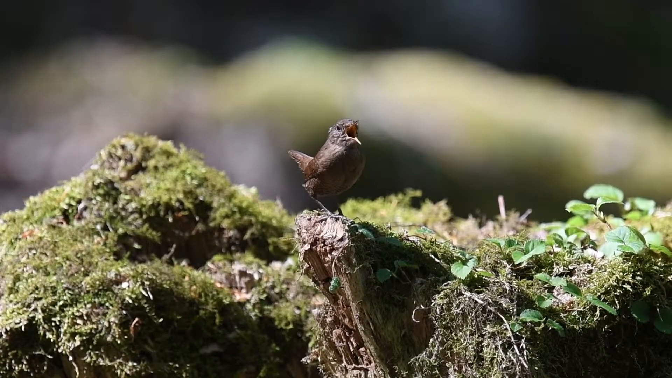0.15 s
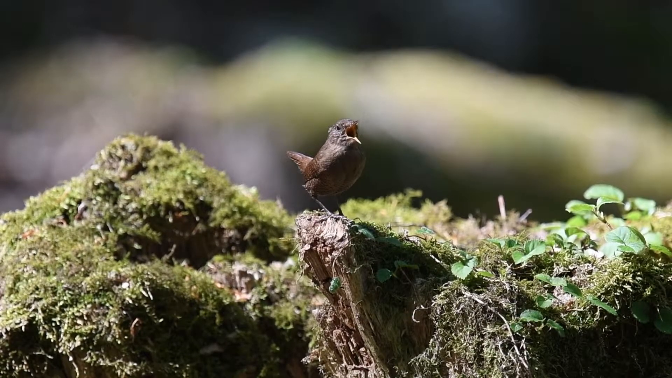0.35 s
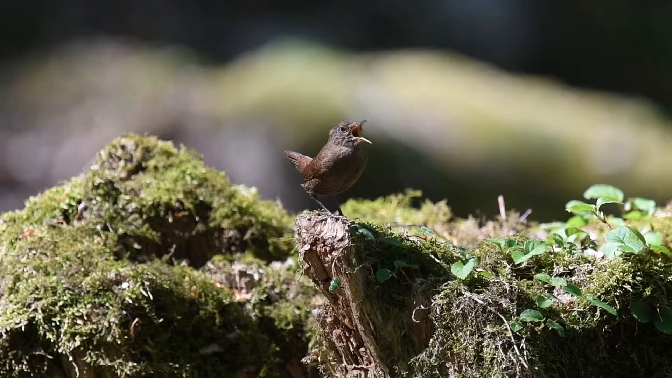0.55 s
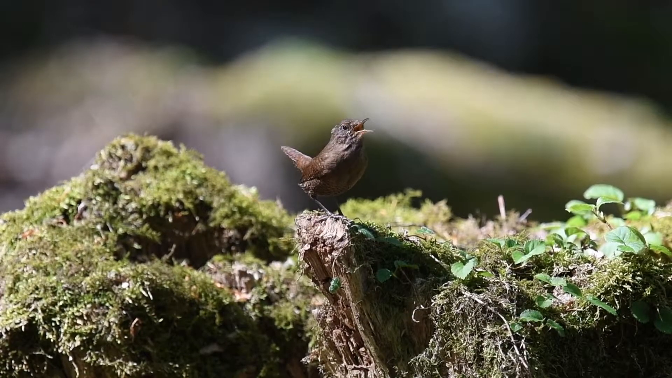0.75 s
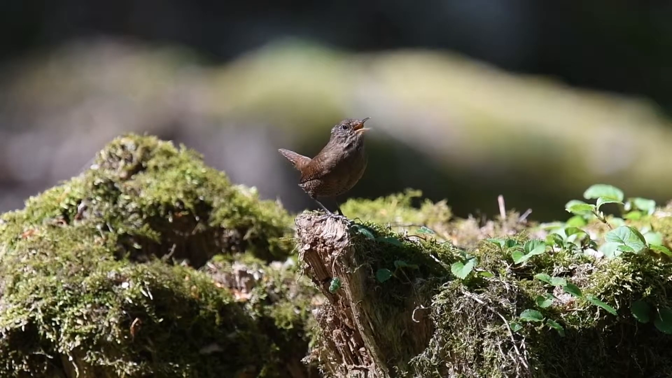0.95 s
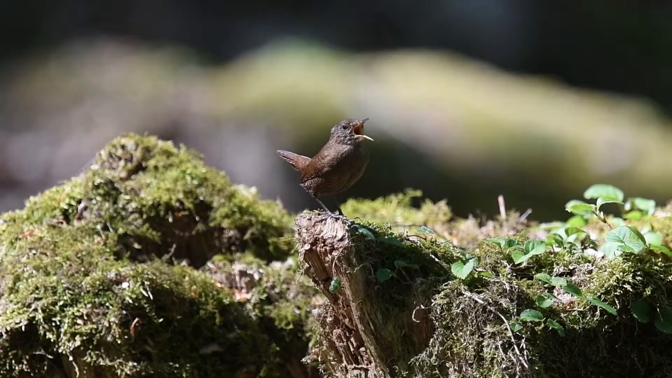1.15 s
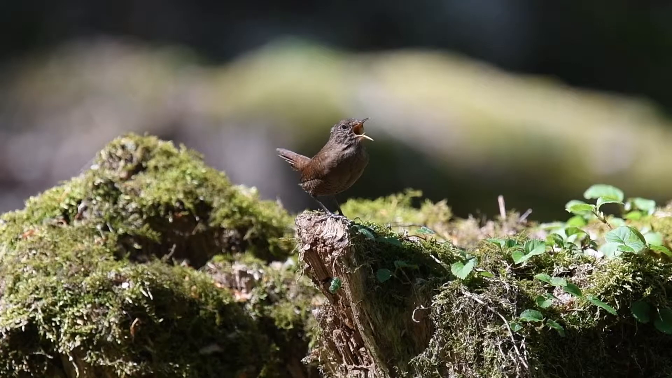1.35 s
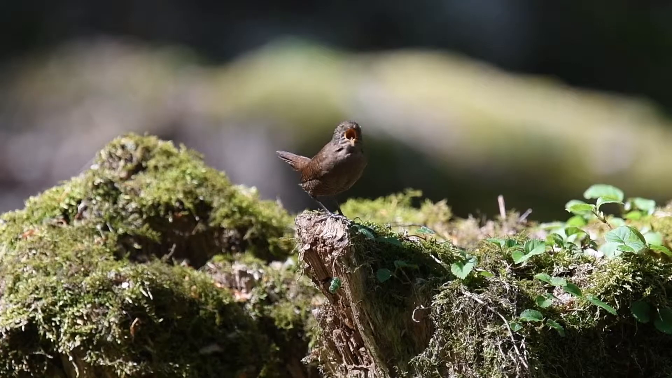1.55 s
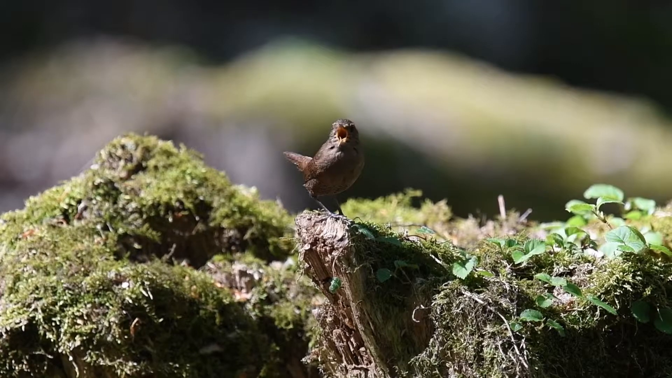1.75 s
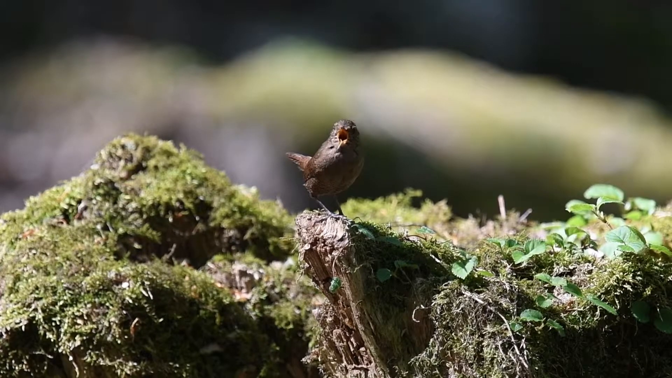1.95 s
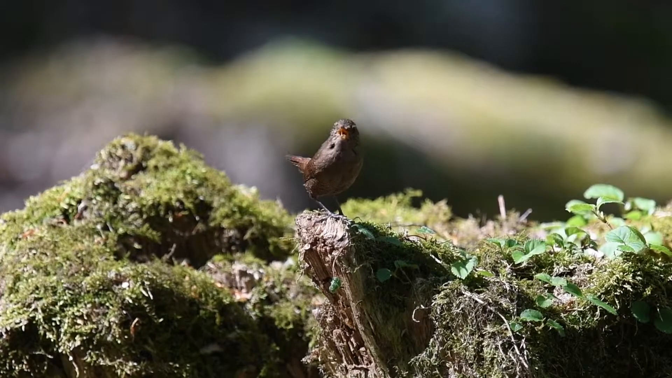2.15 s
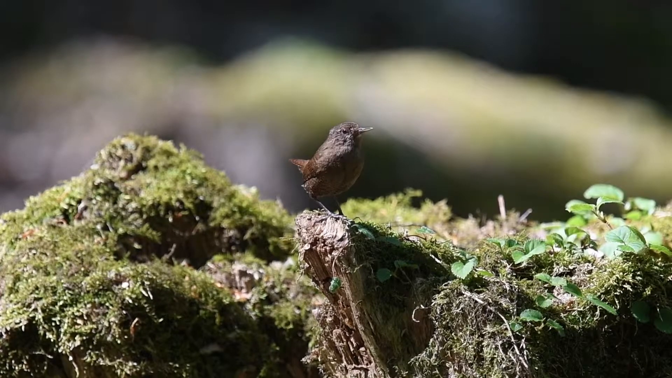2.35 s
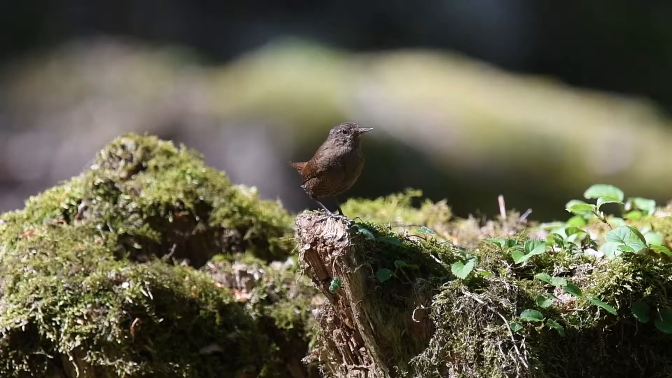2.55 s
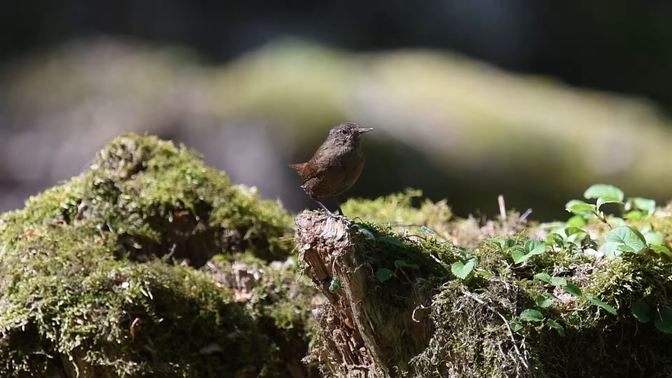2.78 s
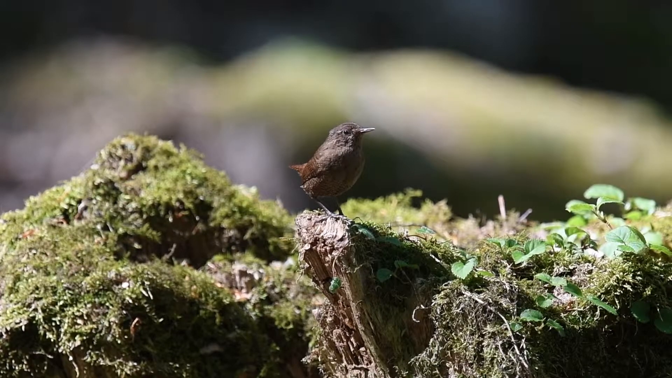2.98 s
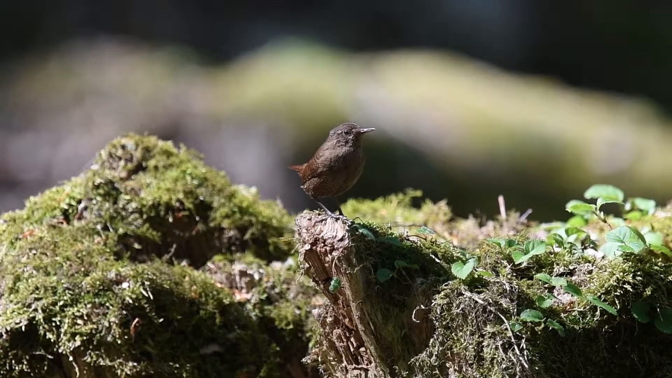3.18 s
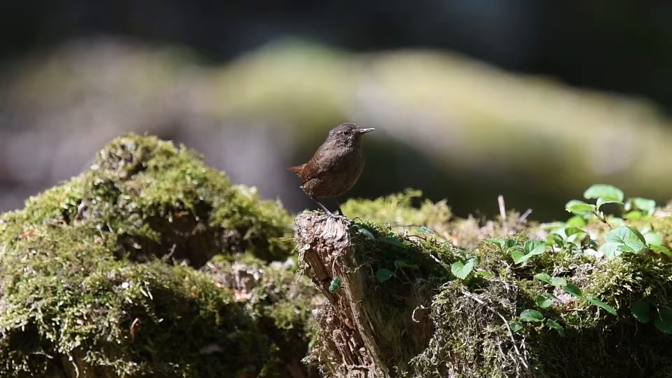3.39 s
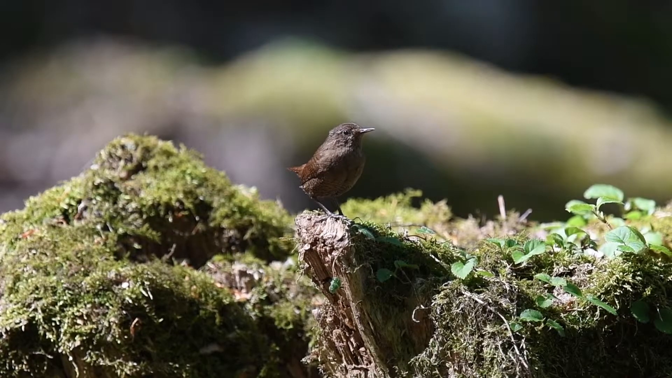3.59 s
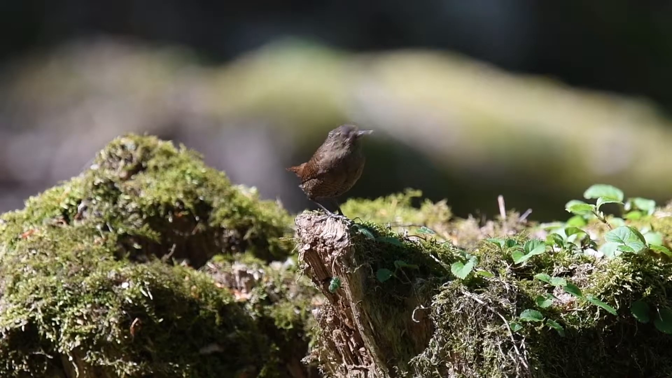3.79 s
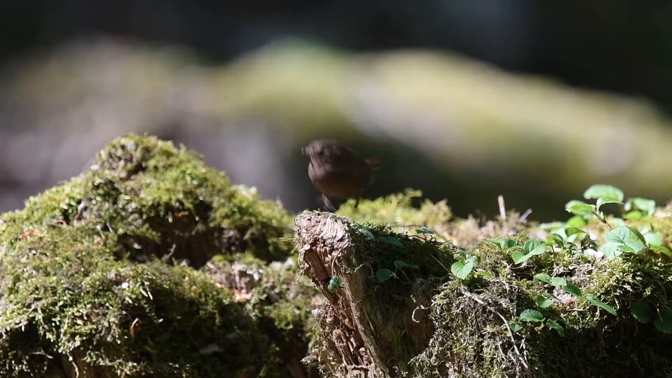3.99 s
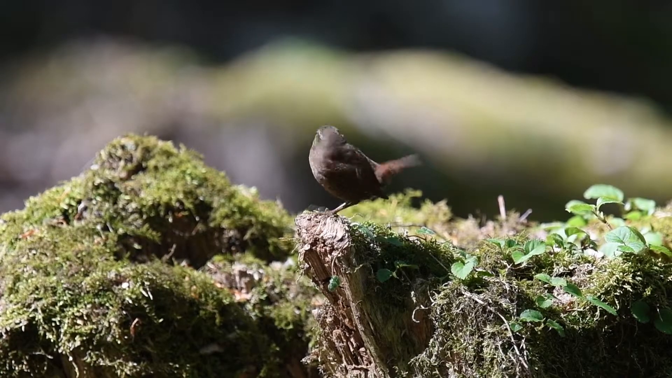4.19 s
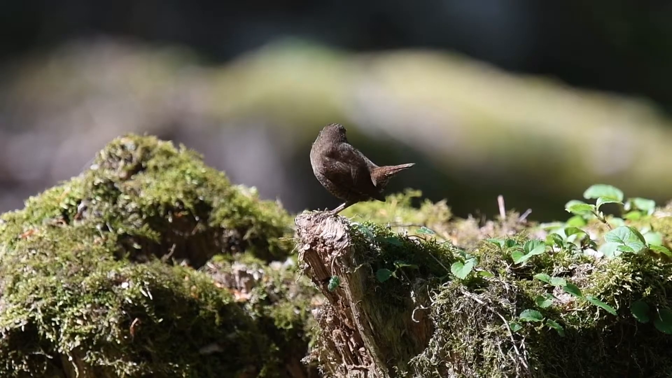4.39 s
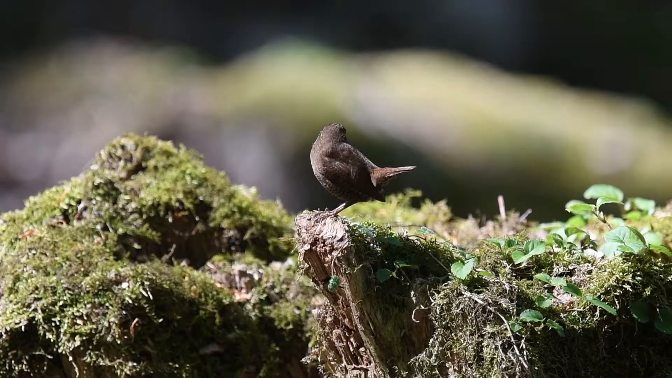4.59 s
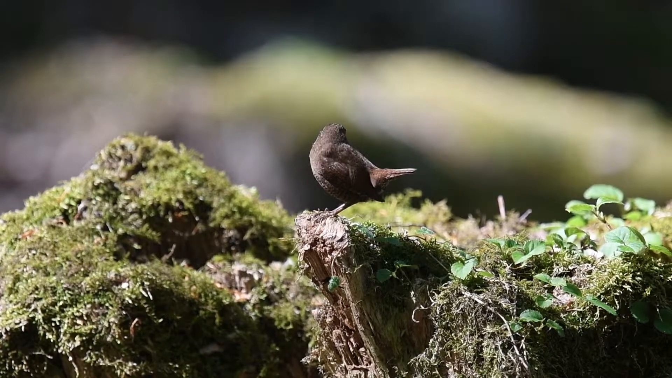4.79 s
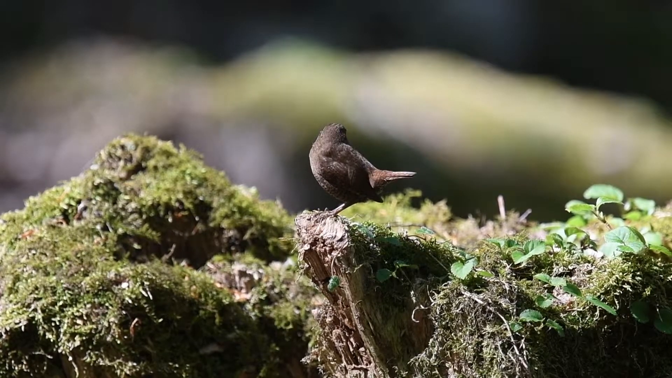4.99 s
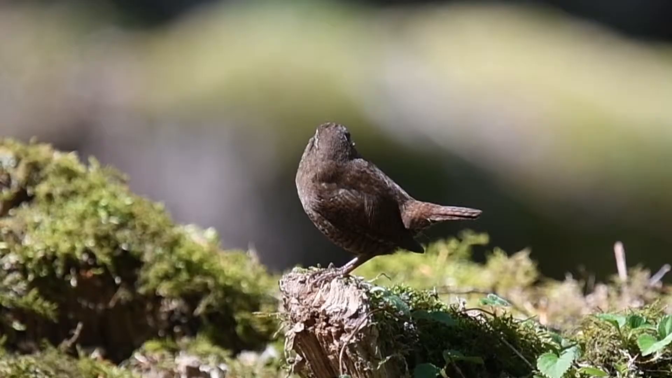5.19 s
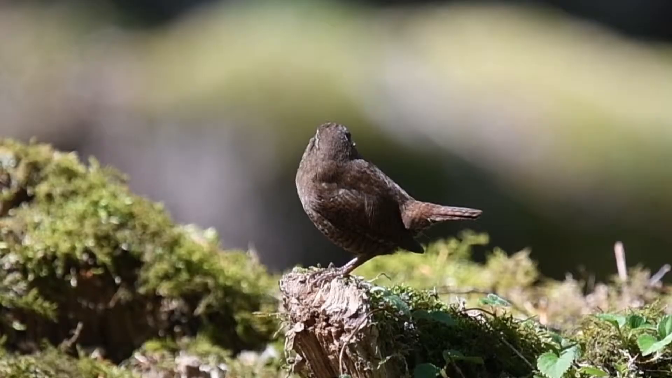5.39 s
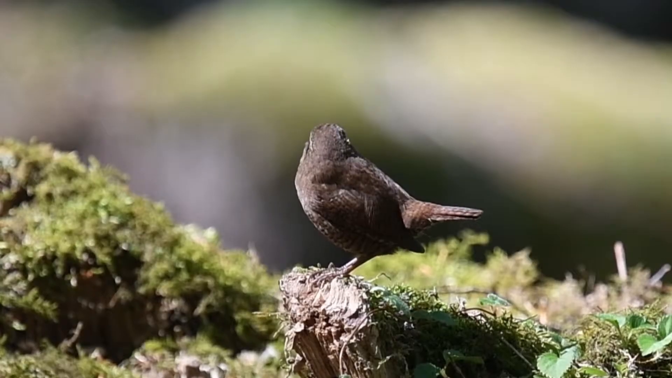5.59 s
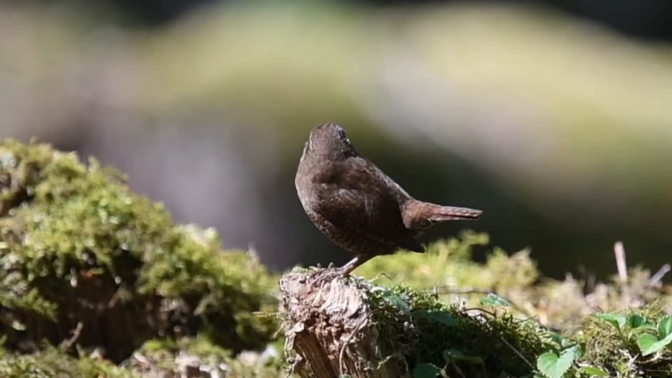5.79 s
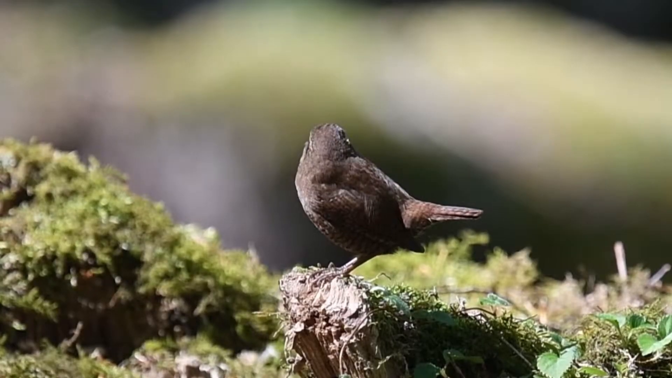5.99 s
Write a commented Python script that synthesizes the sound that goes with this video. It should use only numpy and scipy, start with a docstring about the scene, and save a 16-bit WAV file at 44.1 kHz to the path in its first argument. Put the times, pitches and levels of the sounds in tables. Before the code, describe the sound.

A mountain stream rushes smoothly and evenly for about six seconds, soft and wide, leaning a little right, without distinct splashes. At 0 s the echo of a wren's previous note fades, and the nearby bird continues with bright, almost pure whistles, each about a tenth of a second: a short flick, high arches, a falling note, then two upward sweeps near 0.85 and 1.0 s. From 1.4 to 2.1 s it quickens into a tight trill of repeated three-note groups, then ends with a lower note and a tiny blip by 2.3 s. Close reflections and a short woodland ring surround it. Two faint distant calls lie beneath at 0.4 and 0.75 s. From 2.3 to 4.2 s, far birds answer with quick sliding whistles and tiny chips, mostly slightly right. Sparser faint tones follow, then soft pips around 5.2 s and fluttering rising whistles at 5.5 and 5.8 s, blurred by echo.

```python
"""A mountain stream runs throughout: shaped noise in a smooth, even rush a little to the right.
It opens on the echo of a wren's note; close by on a mossy stump, the wren ends its song by 2.3 s.
Its notes are gliding near-pure sines with faint overtones, near echoes and a ring between the trees.
Two faint calls of farther birds sound under the song; from its last note to the end many more answer,
as fluttering whistles in a wash of scattered sound."""
import sys
import numpy as np
from scipy import signal
from scipy.fft import rfft, irfft, next_fast_len
from scipy.io import wavfile

SR = 44100
rng = np.random.default_rng(int(sys.argv[2]) if len(sys.argv) > 2 else 0)


def to_wav(sig):
    """Store sig (one row per channel, or 1-D mono) as 16-bit WAV at the path in sys.argv[1].

    Samples outside -1..1 are clipped; the rate is SR.
    """
    pcm = np.clip(np.atleast_2d(sig), -1, 1) * 32767
    pcm = np.round(pcm).astype(np.int16)
    wavfile.write(sys.argv[1], SR, pcm.T)  # frames by channels


N = 266364
LEAD = SR // 4  # samples of run-up, so that a note before the start can leave its echo
CUTOFF_HZ = 15750
EDGE_S = 0.0016  # fade at both ends of every whistle

# Colour of the stream. Each row: frequency in Hz, relative level in dB per Hz.
STREAM_SPECTRUM = [(25, -33.5), (50, -22.5), (90, -7.5), (150, -6.5), (250, -8), (450, -5), (900, -5),
                   (1600, -3), (3000, -8), (5500, -13), (7500, -17.5), (9500, -24), (12000, -36.5),
                   (15700, -29.5)]
STREAM_DB = -38.5  # RMS over both channels
# Lean of the stream to one side. Each row: frequency in Hz, left minus right in dB.
STREAM_BALANCE = [(330, 0), (450, -.6), (740, -2), (1300, -3.6), (2200, -3.4), (3300, -2.5), (6000, -1.6),
                  (15000, -.5)]
# Width of the stream. Each row: frequency in Hz, share that only the left hears in dB,
# lag of the left in the shared part in radians.
STREAM_WIDTH = [(60, -37, 0), (200, -38, 0), (300, -24, 0), (450, -11, .1), (800, -4, .4),
                (1200, -1.1, 1.2), (1600, -.8, 2.1), (2300, -.8, 3.0), (3500, -.3, 3.6), (6800, -.1, 5.9)]

# Ring of the wood. Each row: frequency in Hz, time to die by 60 dB in seconds (for the wren).
WOOD_DECAY = [(3000, 0.73), (6000, 0.56), (9000, 0.39)]
WOOD_ONSET_S = 0.0033
FAR_DECAY_SHARE = .9  # far echoes die away a little sooner

# Call shapes of the far birds, by name. Each row: time from the start of the call in seconds,
# pitch in Hz before each call transposes it, level in dB relative to the call.
FAR_SHAPES = { "hook": [(0, 5150, -12), (.008, 4950, -7), (.026, 4610, -2), (.075, 4570, 0),
              (.11, 4180, -6)], "slide": [(0, 6040, -4), (.015, 5240, -4.5), (.035, 4300, -1.5),
              (.05, 3970, -10)], "lift": [(0, 3950, -10), (.01, 4220, -1), (.035, 4360, 0),
              (.06, 4450, -6)], "chip": [(0, 7600, -3), (.01, 8470, 4), (.02, 7500, 4), (.03, 8100, 1.5),
              (.045, 7440, -17)], "tick": [(0, 7700, -1), (.012, 9050, -4), (.035, 7800, 3)],
              "rise": [(0, 6200, -17), (.022, 6630, -2.5), (.045, 6830, 0.5), (.11, 6750, -14)],
              "buzz": [(0, 8530, 5), (.03, 8450, -1), (.1, 8450, 2), (.13, 8520, -5)],
              "flat": [(0, 4000, -4), (.03, 4010, 0), (.07, 4010, -1), (.16, 4000, -10)],
              "pip": [(0, 4000, -6), (.012, 4010, 0), (.04, 4000, -5)], "puff": [(0, 4290, 1),
              (.02, 4430, 5), (.05, 4380, -6)], "high arch": [(0, 2500, -16), (.04, 3600, -5),
              (.07, 3760, 0), (.12, 3420, -4), (.165, 3700, 0), (.2, 3620, -12)],
              "low arch": [(0, 2600, -14), (.04, 3330, 0), (.065, 2980, -6), (.11, 3300, -1),
              (.18, 3320, -6)], }
# Far calls. Each row: start in seconds, shape, top pitch in Hz, level in dB added to the shape,
# left minus right in dB.
FAR_CALLS = [ (.39, "high arch", 3780, -38, .5), (.755, "low arch", 3330, -41, .1),
             (2.255, "chip", 8900, -52.5, -1.5), (2.435, "hook", 5250, -43, -2.5),
             (2.63, "slide", 5960, -41.5, -1), (2.751, "lift", 4460, -42.5, -3),
             (2.845, "chip", 8360, -52.5, -3), (2.865, "hook", 5060, -39.5, -5.5),
             (3.08, "slide", 5970, -37, -2.5), (3.198, "chip", 8350, -48.5, -5),
             (3.198, "lift", 4510, -39, -3), (3.319, "hook", 5050, -37, -5.5),
             (3.525, "slide", 5950, -37, -4), (3.659, "lift", 4400, -40, -2),
             (3.77, "hook", 5170, -36.5, -1.5), (3.981, "slide", 5900, -39, -2),
             (4.096, "lift", 4340, -42, -2), (4.12, "flat", 6020, -57, .1),
             (4.139, "chip", 8620, -47.5, -7), (4.245, "flat", 4590, -49, .5),
             (4.425, "flat", 5360, -51, .1), (4.792, "chip", 8540, -47, -4),
             (5.15, "rise", 6540, -48.5, -1), (5.185, "pip", 3760, -48, -.5), (5.25, "pip", 3760, -47, -.5),
             (5.29, "pip", 3760, -46, -.5), (5.375, "pip", 3750, -49, -.5), (5.42, "pip", 3750, -49, -.5),
             (5.485, "pip", 3750, -50, -.5), (5.5, "rise", 6700, -39.5, -2),
             (5.502, "tick", 9070, -48, -12), (5.54, "buzz", 8560, -56, -5), (5.68, "puff", 4400, -50, -4),
             (5.76, "rise", 6690, -39.5, -1), (5.785, "buzz", 8520, -54, -4), (5.93, "puff", 4400, -53, 0),
             ]
# How distance treats each shape. Each entry: fluttering share of the power from 0 to 1,
# flutter in Hz, level sent to the wood in dB, lag of the left in seconds.
FAR_DISTANCE = {"hook": (.35, 110, -2.5, 45e-6), "slide": (.65, 300, 0, 45e-6),
                "lift": (.45, 120, -3, 45e-6), "chip": (.6, 300, -3, 45e-6), "tick": (.1, 100, -9, 45e-6),
                "rise": (.8, 220, 0, 15e-6), "buzz": (.9, 200, -3, 15e-6), "flat": (.25, 60, -1, 5e-6),
                "pip": (.2, 40, -6, 5e-6), "puff": (.8, 150, 0, 5e-6), "high arch": (.3, 60, 1, 90e-6),
                "low arch": (.3, 60, 1, 90e-6)}

# Overtones of the wren. Each row: multiple of the pitch, level in dB relative to a whistle
# of 5 kHz at -10 dB, tilt in dB per kHz of pitch above 5 kHz.
OVERTONES = [(2, -37.5, -6.5), (3, -52.5, 2)]
EFFORT_SHARE = .5  # further dB of overtone for each dB of whistle level above -10
# Slight unsteadiness of the wren's voice: fluttering share of the power from 0 to 1, flutter in Hz.
WREN_FLUTTER = (.005, 120)
WREN_LAG_S = 15e-6  # left hears later
WREN_WET_DB = -13.5
# Echoes off ground and trunks. Each row: delay in seconds, level in dB, left minus right in dB.
NEAR_ECHOES = [(.004, -16.5, 7.5), (.013, -16.5, 2), (.024, -20.5, -3), (.085, -44, 1)]
# Wren syllables, by name. Each row: place in the note from 0 to 1 before its turn is timed,
# glide (0 first pitch, 1 turning pitch, 2 and above last pitch), level in dB relative to the note.
SYLLABLES = { "flick": [(0, 0, -21), (.11, 0, -2.5), (.29, 1, 1), (.8, 1.01, -1), (.91, 1.11, 3.5),
             (.97, 1.3, -7.5), (1, 2.4, -11)], "arch": [(0, 0, -20), (.05, 0.36, -10.5), (.13, 0.57, -3),
             (.22, .9, 0), (.32, 1, 0.5), (.47, 1.06, -1.5), (.6, 1.25, 0), (.76, 1.66, -5),
             (.93, 1.76, 1.5), (1, 2, -10.5)], "fall": [(0, 0, -26), (.04, 0.081, -13), (.14, 0, -9),
             (.43, 1.08, 0.5), (.55, 1.22, -2.5), (.68, 1.51, -1.5), (.9, 1.94, -4), (.96, 2, -5),
             (1, 2, -13)], "sweep": [(0, 0, -21.5), (.06, .2, -13.5), (.22, 1, -10.5), (.35, 1.04, -7),
             (.62, 1.25, -0.5), (.85, 1.54, 0), (.96, 1.84, -2.5), (1, 2, 1)], "glide": [(0, 0, -12.5),
             (.1, .25, -9.5), (.25, .75, -3.5), (.4, 1, 2), (.8, 1.9, -3.5), (.9, 1.98, -4.5),
             (1, 2.1, -16)], "hump": [(0, 0.18, -19), (.05, .55, -6), (.1, .76, -1), (.17, .85, 0),
             (.5, .94, 0.5), (.78, 1, -3), (.88, 1.2, -1.5), (1, 2.3, -10.5)], "drop": [(0, 0.09, -16),
             (.15, .15, -9.5), (.45, .55, -3), (.85, 1, 0), (.92, 1.3, -3), (1, 2.5, -15.5)],
             "dip": [(0, 0.16, -8), (.3, .55, -1.5), (.55, .85, 0.5), (.8, 1, -3), (1, 2.2, -5.5)], }
# Wren notes; only the echo of the first is left, and each note has its own left-right balance.
# Each row: start in seconds, syllable, length in seconds, time from start to the turn in seconds,
# first, turning and last pitch in Hz, first, turning and last level in dB (added to the syllable),
# left minus right in dB.
SONG = [ (-.16, "fall", .12, .052, (6100, 6020, 3900), (-12, -9.5, -6.5), .1),
        (0.03, "flick", 0.068, 0.02, (5180, 5090, 5900), (-8.5, -8.5, -7), -0.5),
        (0.14, "arch", 0.13, 0.041, (6500, 7940, 6980), (-15, -12, -10), -2.5),
        (0.318, "arch", .135, 0.044, (7050, 8080, 7000), (-10.5, -10, -12), -1),
        (.501, "arch", .116, .042, (7550, 8210, 7030), (-9, -16, -8), -.2),
        (0.668, "fall", 0.11, 0.045, (6010, 6000, 4400), (-5, -7, -11), 0.5),
        (.85, "sweep", 0.096, 0.021, (3840, 3770, 6520), (-9, -9, -8.5), -0.2),
        (1.013, "sweep", 0.088, 0.019, (3870, 3790, 6330), (-9, -9, -8.5), .1),
        (1.151, "glide", 0.11, 0.042, (7680, 8280, 8580), (-15, -14.5, -18.5), -5.5),
        (1.298, "fall", 0.11, .046, (7580, 7170, 5630), (-12, -10.5, -5), -0.5),
        (1.442, "glide", 0.039, .016, (5600, 6030, 5990), (-8.5, -10, -11), -5.5),
        (1.521, "hump", 0.065, 0.049, (5260, 6810, 6400), (-8, -10.5, -10), 0.5),
        (1.587, "drop", .039, 0.034, (6150, 5160, 4770), (-6, -7.5, -8.5), 0.5),
        (1.638, "dip", 0.028, 0.021, (6740, 5960, 6050), (-9.5, -9, -9), -3.5),
        (1.721, "hump", 0.066, 0.053, (5170, 6790, 6350), (-9.5, -9, -12), 1),
        (1.791, "drop", 0.034, .031, (5840, 5120, 4800), (-7, -6, -6), -1),
        (1.838, "dip", .031, 0.024, (6580, 5840, 5900), (-8.5, -9, -8), -2.8),
        (1.922, "hump", .071, 0.052, (5300, 6750, 6450), (-11.5, -11, -9), 0.5),
        (1.995, "drop", 0.036, .033, (6300, 5150, 4740), (-11.5, -7.5, -7), -0.5),
        (2.046, "dip", 0.025, .024, (6500, 5960, 5900), (-9.5, -9, -9), -2),
        (2.141, "glide", 0.072, 0.027, (4170, 4050, 4000), (-16, -14, -11.5), -0.5),
        (2.245, "glide", 0.013, .006, (3700, 4600, 4400), (-21, -23.5, -22), -0.5), ]


def from_db(db):
    """Turns decibels into an amplitude factor."""
    return 10 ** (np.asarray(db) / 20)


def pan_gains(left_minus_right_db, db=0):
    """Gains of left and right, half the difference up on one side and half down on the other."""
    half = left_minus_right_db / 2
    return from_db([[db + half], [db - half]])


def at_hz(points, hz, column=1):
    """Reads a table column at any frequency, in straight lines over log frequency."""
    points = np.array(points)
    return np.interp(np.log(hz + 1e-9), np.log(points[:, 0]), points[:, column])


def stream():
    """Countless far splashes merge into smooth noise, alike in both channels only in the bass."""
    size = next_fast_len(N)
    hz = np.arange(size // 2 + 1) * SR / size
    shared, left_only = rfft(rng.standard_normal((2, size))) * from_db(at_hz(STREAM_SPECTRUM, hz))
    apart = from_db(at_hz(STREAM_WIDTH, hz))
    lag = at_hz(STREAM_WIDTH, hz, column=2)
    left = np.sqrt(1 - apart ** 2) * shared * np.exp(-1j * lag) + apart * left_only
    lean = from_db(at_hz(STREAM_BALANCE, hz) / 2)
    rush = irfft([left * lean, shared / lean], size)[:, :N]
    return from_db(STREAM_DB) * rush / np.sqrt(np.mean(rush ** 2))


def wood(x, decay_share=1):
    """Scatter from many trunks: a noise tail dying band by band, different in each channel."""
    t = np.arange(SR) / SR
    tail = 0
    band_edges = np.geomspace(2000, 16000, num=7)
    for low, high in zip(band_edges, band_edges[1:]):
        bandpass = signal.butter(2, [low, high], "band", fs=SR, output="sos")
        band = signal.sosfilt(bandpass, rng.standard_normal((2, SR)))
        t60 = decay_share * at_hz(WOOD_DECAY, np.sqrt(low * high))
        band = band * from_db(-60 * t / t60) * (1 - np.exp(-t / WOOD_ONSET_S))
        # energy in proportion to bandwidth: the ring favours no band
        energy = np.mean(np.sum(band ** 2, axis=1))
        tail = tail + band * np.sqrt(2 * (high - low) / SR / energy)
    return signal.fftconvolve(x, tail, axes=1)[:, :x.shape[1]]


def flutter_noise(length, flutter_hz):
    """Slow noise of RMS 1, different in each channel: white noise through two equal low-pass poles."""
    settle = 2000  # samples for the filter to settle
    pole = np.exp(-2 * np.pi * flutter_hz / SR)
    white = rng.standard_normal((2, settle + length))
    slow = signal.lfilter([1], [1, -2 * pole, pole * pole], white)[:, settle:]
    return slow / np.sqrt(np.mean(slow ** 2))


def add_whistle(track, rows, pan_db, lag_s, overtones=(), flutter_share=0, flutter_hz=50):
    """Adds one whistle: a sine gliding along the pitch column, with short soft edges."""
    s, hz, db = np.transpose(rows)
    at = np.arange(round(s[0] * SR), min(round(s[-1] * SR), N))
    t = at / SR
    pitch = np.interp(t, s, hz)
    level_db = np.interp(t, s, db)
    cycles = np.cumsum(pitch) / SR + rng.random()
    phase = 2 * np.pi * (cycles - pitch * [[lag_s], [0]])  # only the left lags
    tone = np.sin(phase)
    effort_db = EFFORT_SHARE * (level_db + 10)
    for multiple, overtone_db, tilt in overtones:
        gain = from_db(overtone_db + tilt * (pitch / 1000 - 5) + effort_db)
        below_nyquist = multiple * pitch < SR / 2
        tone = tone + gain * np.sin(multiple * phase) * below_nyquist
    flutter = flutter_noise(len(t), flutter_hz)
    tone = tone * (np.sqrt(1 - flutter_share) + np.sqrt(flutter_share) * flutter)
    edges = np.clip(np.minimum(t - s[0], s[-1] - t) / EDGE_S, 0, 1)
    # the root of 2 makes the level an RMS level
    track[:, at + LEAD] += pan_gains(pan_db) * np.sqrt(2) * from_db(level_db) * edges * tone


def far_birds():
    """Each call plays its shape at its own pitch; distance blurs it and makes it much wetter."""
    direct, scattered = 0, 0
    for name, (flutter_share, flutter_hz, echo_db, lag_s) in FAR_DISTANCE.items():
        calls = np.zeros((2, N + LEAD))
        for s, shape, top_hz, db, pan_db in FAR_CALLS:
            if shape == name:
                rows = np.array(FAR_SHAPES[shape])
                transpose = top_hz / rows[:, 1].max()
                rows = rows * [1, transpose, 1] + [s, 0, db]
                add_whistle(calls, rows, pan_db, lag_s, (), flutter_share, flutter_hz)
        direct = direct + calls
        scattered = scattered + from_db(echo_db) * calls
    return (direct + wood(scattered, FAR_DECAY_SHARE))[:, LEAD:]


def wren():
    """Near-pure gliding whistles, with delayed copies off ground and trunks and the ring of the wood."""
    song = np.zeros((2, N + LEAD))
    for s, syllable, length_s, turn_s, pitches_hz, levels_db, pan_db in SONG:
        place, glide, shape_db = np.transpose(SYLLABLES[syllable])
        # stretch the syllable so that its turn falls on time
        turn_place = np.interp(1, glide, place)
        times = s + np.interp(place, [0, turn_place, 1], [0, turn_s, length_s])
        hz = np.interp(glide, [0, 1, 2], pitches_hz)
        db = np.interp(glide, [0, 1, 2], levels_db) + shape_db
        rows = np.transpose([times, hz, db])
        add_whistle(song, rows, pan_db, WREN_LAG_S, OVERTONES, *WREN_FLUTTER)
    echoes = 0
    for delay_s, db, pan_db in NEAR_ECHOES:
        echoes = echoes + pan_gains(pan_db, db) * np.roll(song, round(delay_s * SR), axis=1)
    return (song + echoes + from_db(WREN_WET_DB) * wood(song))[:, LEAD:]


def scene():
    """Stream, far birds and wren together."""
    return stream() + far_birds() + wren()


def record(dry):
    """A steep elliptic low-pass cuts the top."""
    low_pass = signal.ellip(14, .5, 90, CUTOFF_HZ, fs=SR, output="sos")  # ripple and stop band in dB
    return signal.sosfilt(low_pass, dry)


dry = scene()
out = record(dry)
to_wav(out)
```